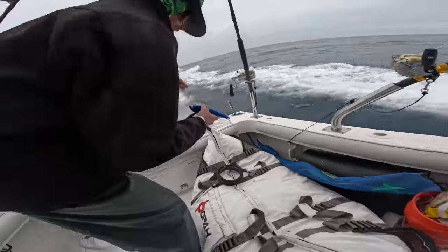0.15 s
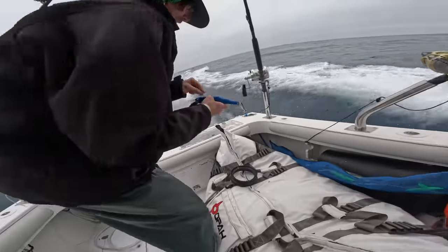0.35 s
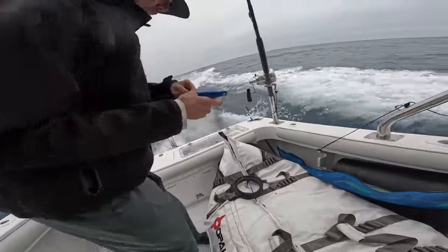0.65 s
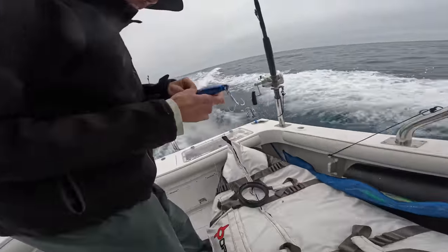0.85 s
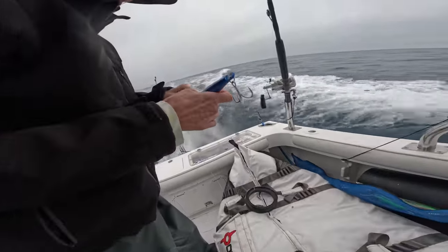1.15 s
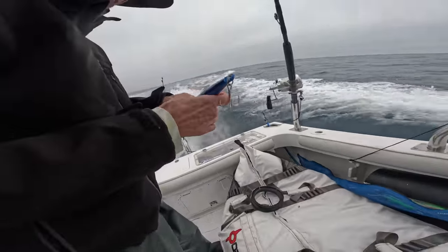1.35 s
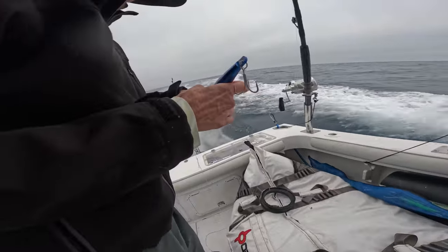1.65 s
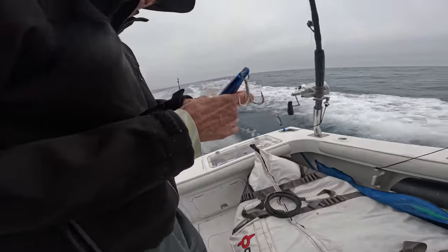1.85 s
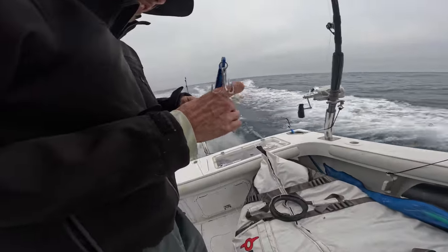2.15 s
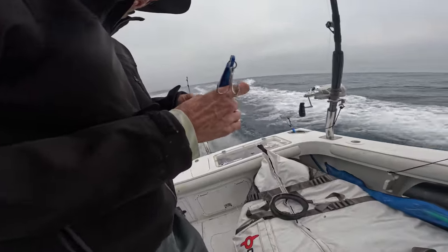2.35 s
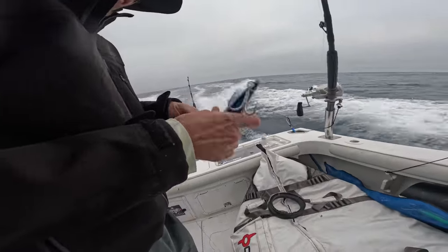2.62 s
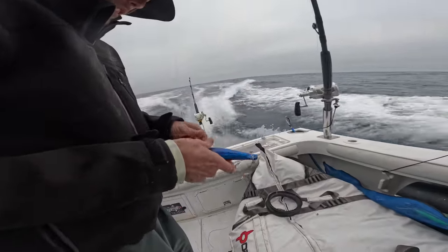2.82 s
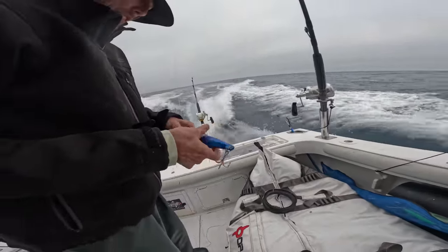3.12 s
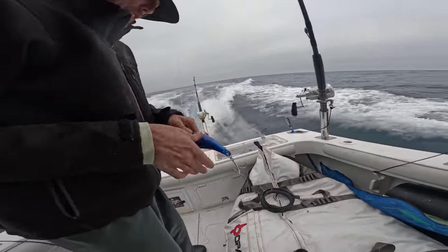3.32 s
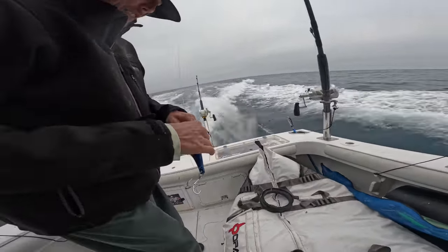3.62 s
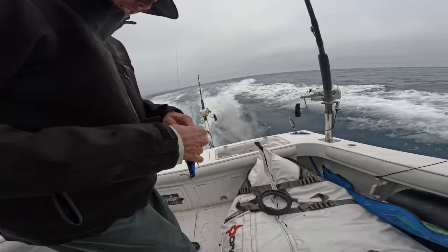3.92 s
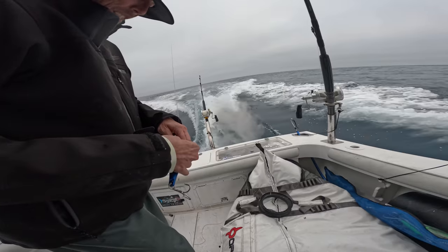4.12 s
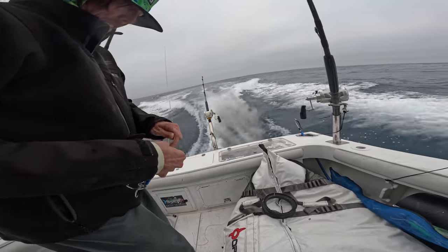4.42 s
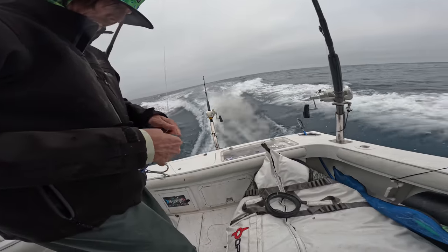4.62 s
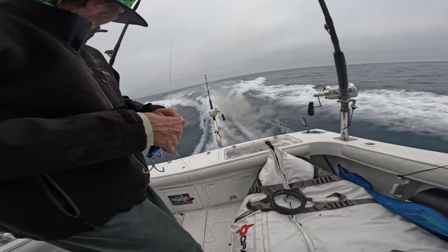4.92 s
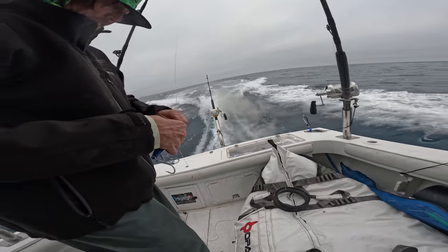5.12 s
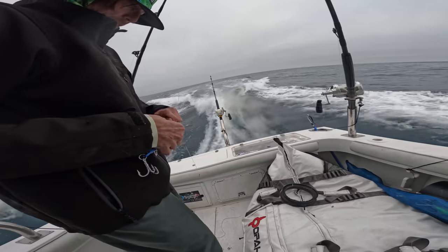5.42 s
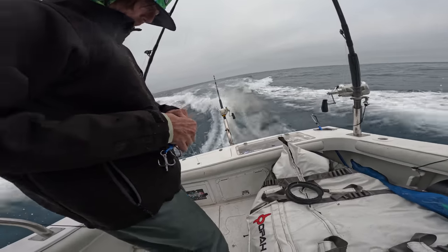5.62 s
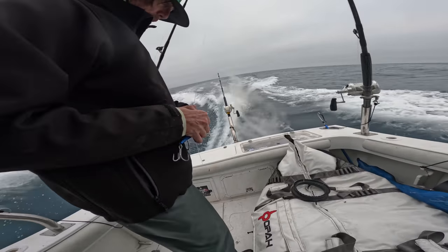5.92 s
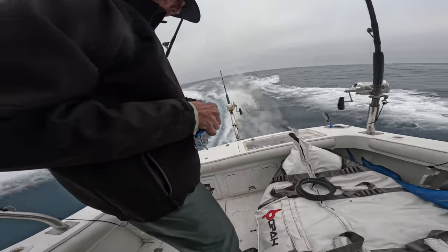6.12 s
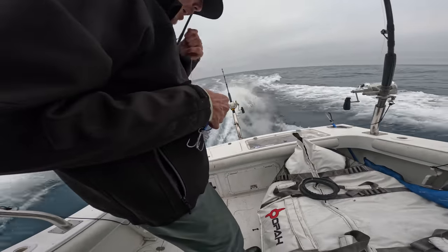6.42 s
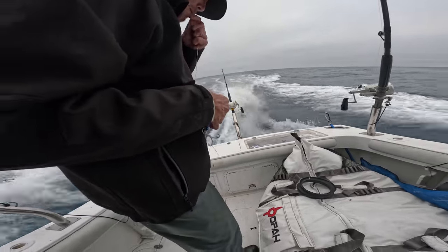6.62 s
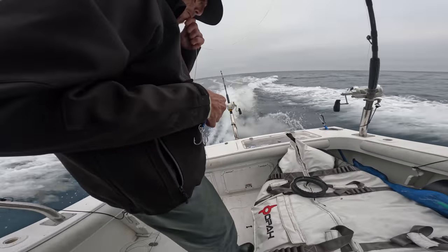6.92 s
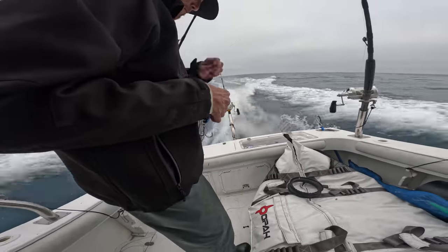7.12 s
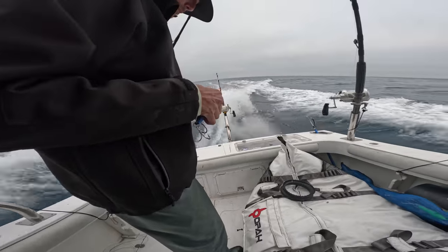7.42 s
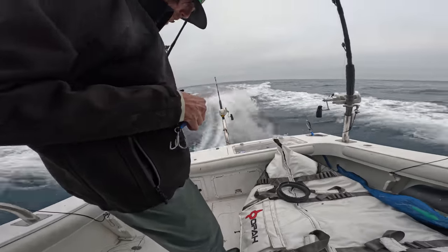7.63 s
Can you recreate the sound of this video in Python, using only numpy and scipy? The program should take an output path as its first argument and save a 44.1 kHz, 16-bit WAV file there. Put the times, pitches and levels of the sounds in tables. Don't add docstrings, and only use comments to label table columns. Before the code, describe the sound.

Two boat diesels drone deeply with a slow throbbing beat, wet exhaust gurgling, wake rushing astern, and small metal hooks tinkling briefly midway.

```python
import sys
import numpy as np
from scipy import signal
from scipy.fft import rfft, irfft
from scipy.io import wavfile
from scipy.ndimage import uniform_filter1d

SR = 44100
rng = np.random.default_rng(int(sys.argv[2]) if len(sys.argv) > 2 else 0)


def pcm_store(signal):
    levels = np.round(np.clip(np.atleast_2d(signal), -1, 1) * 32767)
    wavfile.write(sys.argv[1], SR, levels.astype(np.int16).T)


def makeup_ratio(level_db):
    decades = np.asarray(level_db, float) / 20
    return 10 ** decades


N = 342216


def curves(table):
    s, *columns = np.transpose(table)
    return [np.interp(np.arange(N) / SR, s, column) for column in columns]


def bumps(table):
    t = np.arange(N) / SR
    return sum(db * np.exp(-((t - s) / width) ** 2) for s, db, width in table)


def unit(x):
    return x / np.sqrt(np.mean(x ** 2))


def walk(rate):
    hold = int(SR / rate)
    steps = np.repeat(rng.standard_normal(N // hold + 1), hold)
    return unit(uniform_filter1d(uniform_filter1d(steps, hold), hold)[:N])


def tone(cycles, db):
    return np.sqrt(2) * makeup_ratio(db) * np.sin(2 * np.pi * cycles)


def bands(spectrum, shape, flicker_db, rate):
    hz = np.arange(N // 2 + 1) * SR / N + 1e-3
    point_hz, point_db = np.transpose(spectrum)
    colour_db = np.interp(np.log(hz), np.log(point_hz), point_db, left=-90, right=-90)
    noise = rfft(rng.standard_normal(N)) * makeup_ratio(colour_db)
    place = 3 * np.log2(hz)
    first, last = int(3 * np.log2(point_hz[0])), int(3 * np.log2(point_hz[-1])) + 1
    out = 0
    for k in range(first, last + 1):
        window = np.cos(np.pi / 2 * np.clip(place - k, -1, 1)) ** 2
        level_db = shape(2 ** (k / 3)) + flicker_db * walk(rate)
        out = out + irfft(noise * window, N) * makeup_ratio(level_db)
    return out


def throttle():
    # start_s, firing_hz, note_db, water_db
    engine = [
        (0, 79.06, -15, 1.5),
        (1.3, 78.93, -15.5, -1.5),
        (3.2, 78.93, -16, 0.5),
        (3.8, 82.23, -14, 0.5),
        (4.4, 82.8, -13.5, 0),
        (4.9, 83.66, -15, -0.5),
        (6.1, 83.48, -16, 2),
        (6.8, 84.1, -16.5, 3.5),
        (7.76, 83.8, -16.5, 1.5),
    ]
    return curves(engine)


def far_engine_lead():
    opposed_s = [-.68, .6, 1.87, 3.12, 4.4, 5.72, 7.01, 8.3]
    ahead, = curves([(s, k + .5) for k, s in enumerate(opposed_s)])
    dwell = 0.52
    return ahead - dwell * np.sin(2 * np.pi * ahead) / (2 * np.pi)


def outlet_clearance():
    # start_s, level_db
    outlet = [(0, -1), (.15, -13), (.55, 3), (1.3, -11), (1.6, 2), (1.9, -4), (2.2, 4), (2.55, -15),
              (2.95, -4.5), (3.5, -17), (4.05, -13.5), (4.35, -1.5), (4.9, 2.5), (5.35, -3), (6.1, 6),
              (6.4, -4), (7.4, 4.5), (7.76, 0)]
    return curves(outlet)[0]


def firing_notes(crank, ahead, note_db):
    # start_s, level_db
    far = [(0, -11.5), (.6, -6.5), (1.9, -7), (3.1, -6), (4.4, -12), (5.7, -11), (7.0, -9.5), (7.76, -9)]
    # centre_s, depth_db, half_width_s
    stumbles = [
        (0.27, -4, .03),
        (5.70, -5, 0.037),
        (6.885, -1.5, 0.011),
        (7.03, -22, 0.027),
    ]
    far_db, = curves(far)
    firing = 3 * crank + 0.0091 * walk(30)
    note_db = note_db + bumps(stumbles) + .5 * walk(25)
    return tone(firing, note_db) + tone(firing + ahead, note_db + far_db)


def octave_notes(crank, ahead, outlet_db):
    lead = .03
    octave = 6 * crank + lead + 0.03 * walk(4.4)
    octave_db = -24.5 + outlet_db + 1.5 * walk(20)
    return tone(octave, octave_db) + tone(octave + 2 * ahead + .5, octave_db - 16.5)


def third_overtone(crank, hz, opposed, outlet_db):
    swell_db = 1 * opposed + 0.14 * outlet_db
    pipe_db = -0.9 * (hz - hz.mean())
    return tone(9 * crank + 0.054 * walk(3.8), -38 + swell_db + pipe_db + 2.7 * walk(5.6))


def crank_lines(crank, gurgle_db):
    multiples = [1, 1.5, 2, 4, 5, 7, 8, 10.6, 12, 12.8, 13.6, 15, 16.7, 21]
    # near_db, far_db
    line_levels = [(-47.5, -56.5), (-46, -50.5), (-37, -41.5), (-34.5, -53.5), (-40, -39.5), (-41.5, -45),
                   (-46, -44), (-48.5, -45.5), (-39.5, -51.5), (-48, -46.5), (-49.5, -54), (-47.5, -48.5),
                   (-50, -49.5), (-53, -58)]
    far_speed = 1.0095
    swell_db = 0.34 * (gurgle_db - gurgle_db.mean())
    out = 0
    for multiple, (near_db, far_db) in zip(multiples, line_levels):
        for speed, db in ((1, near_db), (far_speed, far_db)):
            turns = speed * crank + 0.0052 * walk(4)
            out = out + tone(multiple * turns + rng.random(), db + swell_db + 1.4 * walk(3.1))
    return out


def gear_whine(crank):
    # multiple of crank rate, level_db
    gears = [
        (52.9, 0),
        (101.9, -7),
        (105.6, -3),
    ]
    # centre_s, rise_db, half_width_s
    surges = [(.07, 10.5, 0.074), (1.02, 9.5, 0.12), (1.4, 9.5, 0.073), (3.15, 5.5, .15), (4.0, 5.5, 0.078),
              (5.0, 8.5, 0.12), (6.0, 6, 0.11)]
    whine_db = -54.5 + bumps(surges)
    out = 0
    for multiple, db in gears:
        out = out + tone(multiple * (crank + 0.0021 * walk(14)), db + whine_db + 1.8 * walk(6.1))
    return out


def exhaust_gurgle(crank, gurgle_db):
    # pitch_hz, level_db per Hz
    spectrum = [(20, -25.5), (35, -10), (55, 3), (68, -3), (100, 0), (140, 0.5), (190, 2.5), (222, -5),
                (265, 1.5), (310, -6.5), (360, -8), (400, -18.5), (500, -14), (700, -36.5)]
    slap = 1 + 0.11 * np.cos(2 * np.pi * crank)
    gurgle = unit(bands(spectrum, lambda centre_hz: 0, flicker_db=2.0, rate=9))
    return makeup_ratio(gurgle_db) * slap * gurgle


def engines():
    hz, note_db, water_db = throttle()
    crank = np.cumsum(hz) / SR / 3
    ahead = far_engine_lead()
    opposed = -np.cos(2 * np.pi * ahead)
    outlet_db = outlet_clearance()
    gurgle_db = -26.5 + water_db + 1 * opposed + 0.067 * outlet_db
    out = firing_notes(crank, ahead, note_db)
    out = out + octave_notes(crank, ahead, outlet_db)
    out = out + third_overtone(crank, hz, opposed, outlet_db)
    out = out + crank_lines(crank, gurgle_db)
    out = out + gear_whine(crank)
    return out + exhaust_gurgle(crank, gurgle_db)


def turbo():
    spool_s, spread_s = 3.83, .28
    spool = 1 / (1 + np.exp((spool_s - np.arange(N) / SR) / spread_s))
    hz = 8940 + 1085 * spool
    db = -80 + 4.5 * spool - 9 * spool * (1 - spool)
    near_hz = hz * (1 + .0015 * walk(4) + .002 * walk(40))
    far_hz = hz * (.992 + .002 * walk(4) + .0012 * walk(40))
    near = tone(np.cumsum(near_hz) / SR, db + 1 + 2.5 * walk(10))
    far = tone(np.cumsum(far_hz) / SR, db - 1 + 3 * walk(8))
    return near + far


def wake():
    # start_s, level_db
    foam = [(0, 0.5), (.7, 1), (1.4, -1.5), (2.2, 0), (2.6, -1.5), (3.4, .5), (4.1, -1), (5.2, 0.5),
            (6.4, 0.5), (6.8, .5), (7.2, 2), (7.76, 1)]
    # pitch_hz, level_db per Hz
    spectrum = [(250, -24.5), (400, -3.5), (650, -2.5), (1300, -9.5), (2000, -13), (3900, -15.5),
                (5000, -20.5), (6300, -29), (7100, -29), (8500, -39.5), (11500, -44.5), (12600, -42),
                (13800, -52.5), (15700, -52)]
    foam_db, = curves(foam)
    spray_db = 0.9 * foam_db + .5 * walk(2.3)
    roar_db = 0.39 * foam_db + 1.1 * walk(5.4)

    def shape(centre_hz):
        spray = np.clip(np.log2(centre_hz / 4500), 0, 1.1)
        roar = np.clip(np.log2(1200 / centre_hz), 0, 1)
        return spray * spray_db + roar * roar_db

    return makeup_ratio(-32 + foam_db) * unit(bands(spectrum, shape, flicker_db=0.58, rate=7))


def hooks():
    # start_s, strength_db, ring_hz, second_ring_hz
    taps = [(2.838, 0, 7600, 11800), (2.852, 0, 10500, 5180), (2.860, -2, 10500, 6100),
            (2.911, -1, 15670, 3704), (2.921, -3, 9350, 12280), (2.924, 0, 9100, 5180),
            (2.937, 1, 11330, 15670), (2.948, 0, 12280, 10500), (2.958, -1, 10500, 3704),
            (2.985, -3, 5180, 3704), (3.605, -6, 9350, 11800), (3.981, 2, 8630, 13250),
            (3.992, -4, 10500, 7600), (4.012, -8, 8630, 13250)]
    modes = {3704: (-39, .25), 5180: (-43, .1), 6100: (-54, .06), 7600: (-56, .07), 8630: (-56, .1),
             9100: (-57, .1), 9350: (-55, .15), 10500: (-60, .08), 11330: (-60, .06), 11800: (-61, .06),
             12280: (-54, .4), 13250: (-57, .1), 15670: (-61, .04)}
    out, t = np.zeros(N), np.arange(int(.1 * SR)) / SR
    grip = np.clip(t / .0015, 0, 1) * np.clip((.055 - t) / .02, 0, 1)
    for s, db, *rings in taps:
        ring = 0
        for hz in rings:
            ring_db, t60_s = modes[hz]
            decay = np.exp(-np.log(1000) * t / t60_s)
            ring = ring + makeup_ratio(ring_db) * np.sin(2 * np.pi * hz * t) * decay
        tick = makeup_ratio(-53) * uniform_filter1d(rng.standard_normal(len(t)), size=2) * np.exp(-t / .006)
        i = int(s * SR)
        out[i:i + len(t)] += makeup_ratio(db) * (ring * grip + tick)
    return out


def scene():
    return (engines() + turbo() + wake() + hooks())[None, :]


def top_cut(x):
    return signal.sosfilt(signal.butter(12, 15720, fs=SR, output="sos"), x)


def record(dry):
    memory_s, share = .2, .3
    keep = np.exp(-1 / (memory_s * SR))
    power = dry ** 2 / np.mean(dry ** 2)
    recent = signal.lfilter([1 - keep], [1, -keep], power, zi=[[keep]])[0]
    levelled = dry * recent ** (-share / 2)
    soft = np.tanh(.6 * levelled) / .6
    return top_cut(soft)


dry = scene()
out = record(dry)
pcm_store(out)
```